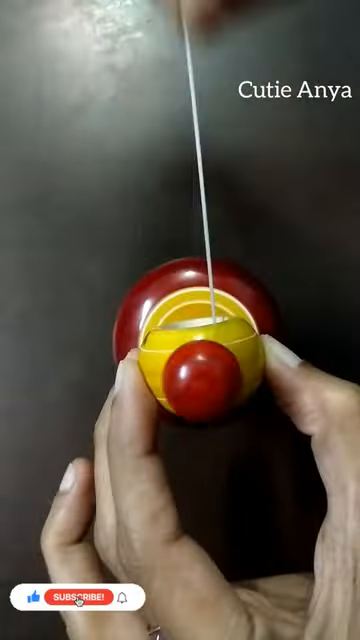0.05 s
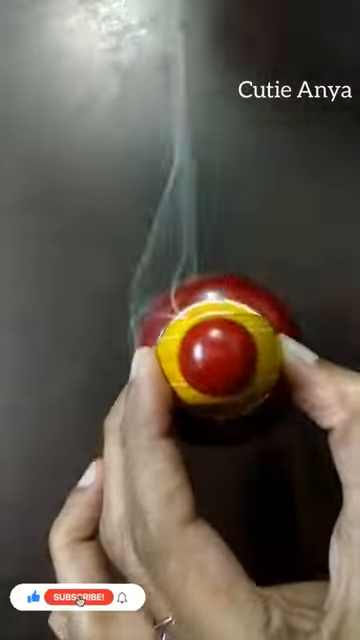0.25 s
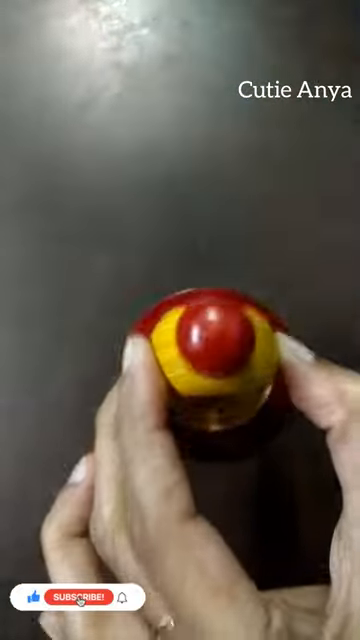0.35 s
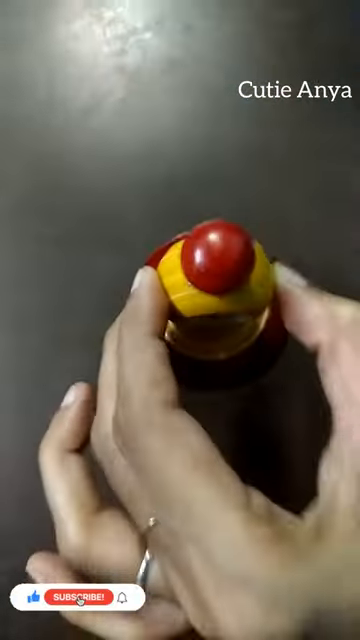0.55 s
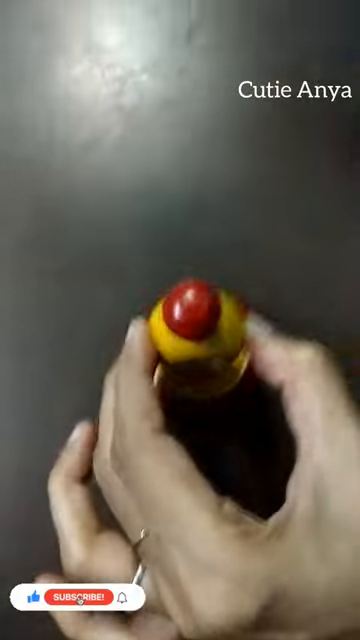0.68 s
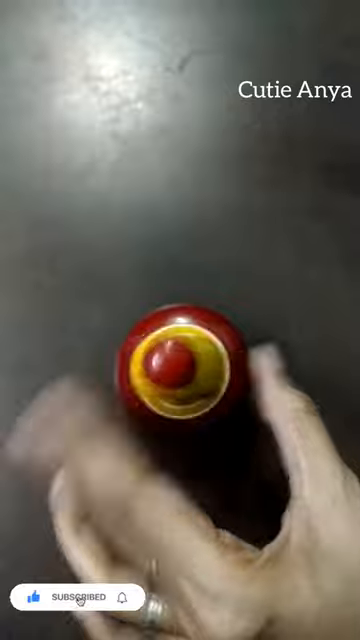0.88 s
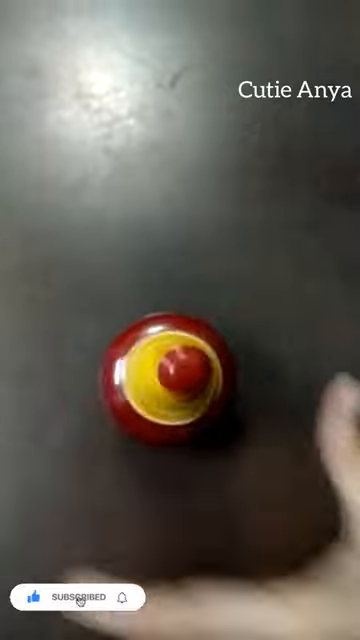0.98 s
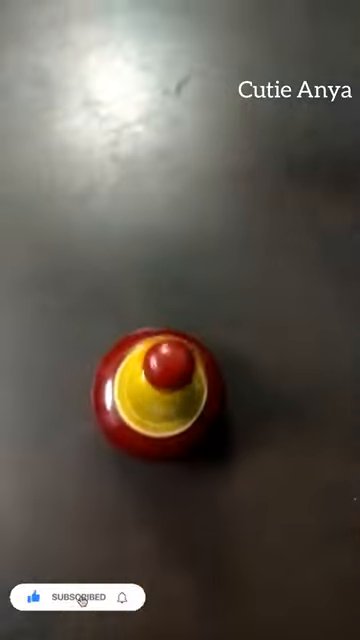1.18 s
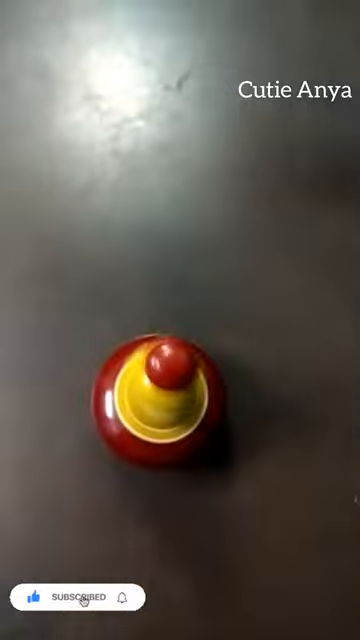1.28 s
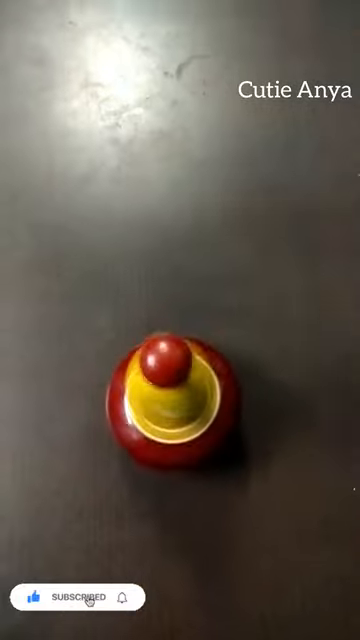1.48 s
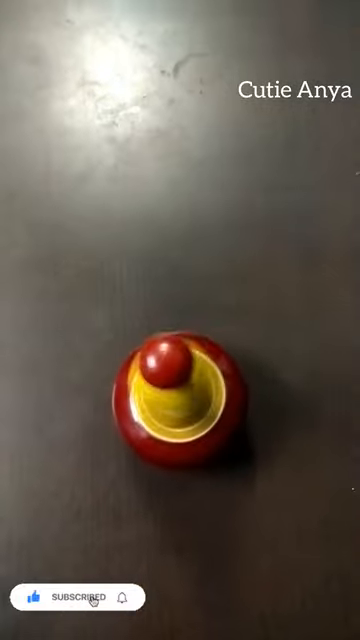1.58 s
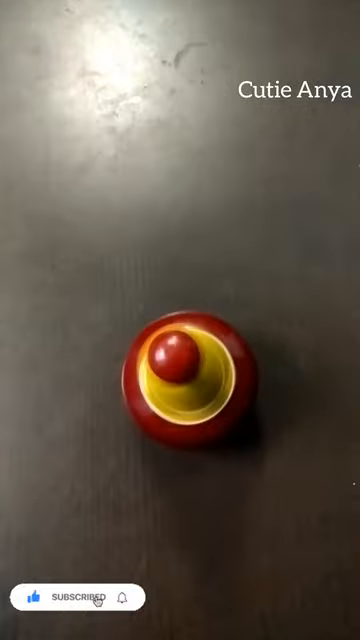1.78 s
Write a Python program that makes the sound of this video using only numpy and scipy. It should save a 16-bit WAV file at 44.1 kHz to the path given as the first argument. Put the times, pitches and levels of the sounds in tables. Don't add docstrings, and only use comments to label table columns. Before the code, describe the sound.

String hisses and whirrs off a hand-held wooden top, which knocks down and spins on faintly

```python
import sys
import numpy as np
from scipy import signal
from scipy.fft import rfft, irfft, next_fast_len
from scipy.io import wavfile
from scipy.ndimage import uniform_filter1d, map_coordinates

SR = 44100
rng = np.random.default_rng(int(sys.argv[2]) if len(sys.argv) > 2 else 0)


def natural_amplitude(level_db):
    exponent = np.asarray(level_db, float) / 20
    return 10 ** exponent


def pcm_store(signal):
    levels = np.round(np.clip(np.atleast_2d(signal), -1, 1) * 32767)
    wavfile.write(sys.argv[1], SR, levels.astype(np.int16).T)


N = 81585

# t/s, level/dB
MOTOR_LEVEL = [(0, -62.5), (.3, -72), (.45, -78), (.6, -81.5)]
# f/Hz, level/dB per Hz
AIR_SPECTRUM = [(12, -5), (20, 2), (131, -15.5), (228, -13), (346, -17.5), (569, -16), (1310, -25.5),
                (6500, -34.5), (14900, -39)]
# f/Hz, left over right/dB
AIR_LEAN = [(60, 3), (900, 3), (2000, -0.5)]
# f/Hz, left leads/rad
AIR_LEAD = [(300, -0.17), (1300, 1.63)]
# f/Hz, left over right/dB
HELD_LEAN = [(300, -2), (1115, 9.5), (2400, -4.5), (5700, 3.5), (6400, -3), (9400, -8.5), (11000, 3.5),
             (14000, 4)]
# f/Hz, left leads/rad
HELD_LEAD = [(300, 0.5), (1115, 0.86), (1500, 4), (2100, 0.2), (3200, -2), (5500, 1), (9070, 2)]
# t/s, level/dB
STRING_LEVEL = [(0, -68.5), (.136, -55), (.2, -47), (.26, -46), (.41, -48), (.6, -55.5), (.75, -52),
                (.8, -57), (.98, -58.5)]
# f/Hz, level/dB per Hz
STRING_SPECTRUM = [(530, -50), (900, -21.5), (1140, -17.5), (4100, -17), (6330, -7), (7200, -11.5),
                   (13700, -13), (14400, -32), (14900, -53)]
# f/Hz, width/Hz, level/dB
NECK_RINGS = [(5646, 480, -7), (6383, 95, 10)]
# t/s, peak level/dB
TURNS = [(0.2403, -34.5), (0.2732, -29.5), (0.2824, -43), (0.315, -32.5), (0.328, -39), (0.3423, -43),
         (0.3706, -35.5), (0.3924, -34.5), (0.4083, -39), (0.4226, -45), (0.4724, -42), (0.4882, -44),
         (0.5636, -40), (0.6455, -39.5), (0.7294, -39), (0.754, -44)]
# t/s, level/dB
SPITS = [
    (0.315, -45),
    (0.512, -46),
    (1.1546, -43.5),
    (1.82, -64),
]
# t/s, level/dB
WHIRR_LEVEL = [(.2, -78), (.34, -51), (.44, -51.5), (.62, -50.5), (.74, -46), (.8, -66)]
# f/Hz, width/Hz, level/dB
AXLE_RINGS = [(9070, 230, 0), (10100, 300, -17), (11900, 400, -17)]
# t/s, peak level/dB
RUBS = [(0.2972, -50), (0.3336, -52), (0.3421, -45), (0.3564, -54), (0.368, -38), (0.399, -38.5),
        (0.4479, -52), (0.463, -41.5), (0.4785, -43.5), (0.4893, -48), (0.5114, -36), (0.525, -34),
        (0.5584, -39), (0.5794, -40), (0.5906, -35.5), (0.5967, -38.5), (0.619, -39), (0.6254, -43),
        (0.6365, -35), (0.644, -42), (0.6564, -39), (0.6701, -37.5), (0.7, -36.5), (0.7134, -45),
        (0.7304, -51), (0.7404, -50), (0.753, -53), (0.7704, -42.5)]
# t/s, level/dB
RATTLE_LEVEL = [(.3, -78), (.35, -57), (.6, -60.5), (.75, -60.5), (.88, -67), (.95, -84), (1.0, -50),
                (1.06, -60), (1.25, -74)]
# f/Hz, width/Hz, level/dB
BODY_RINGS = [(1122.7, 45, 6.5), (2172, 2000, -18)]
# t/s, peak level/dB
JOLTS = [(0.339, -40.5), (0.368, -54), (0.391, -41), (0.4076, -37.5), (0.4682, -36.5), (0.509, -59),
         (0.5284, -54), (0.5802, -44.5), (0.559, -64), (0.612, -53), (0.641, -63), (0.668, -62),
         (0.693, -56), (0.7207, -44), (0.7682, -39), (0.82, -45.5)]
# t/s, peak level/dB, f/Hz
TICKS = [(0.2986, -42, 2680), (0.3295, -46.5, 2700), (0.341, -49.5, 2180), (0.368, -48.5, 2920),
         (0.3926, -41.5, 2624), (0.4206, -42, 2250), (0.4513, -49.5, 2020), (0.4629, -44, 2300),
         (0.5147, -53, 2600), (0.545, -55, 2840), (0.577, -59, 2000), (0.5581, -47, 2190),
         (0.592, -52, 2090), (0.6255, -50.5, 2410), (0.692, -55, 2600), (0.7216, -50.5, 2640),
         (0.7546, -49, 2770), (0.768, -41.5, 2870), (0.85, -57, 3800), (1.138, -59, 4200),
         (1.1556, -51, 1560), (1.211, -62, 2600), (1.1926, -39.5, 3700)]
# f/Hz, width/Hz, level/dB
SHELL_RING = [(6370, 140, 6.5)]
# t/s, level/dB
KNOCKS = [
    (0.7878, -18.5),
    (.792, -21.5),
]
# f/Hz, level/dB, t60/s
TABLE_MODES = [(217, -12, 0.024), (291, -14.5, 0.077), (437, -1.5, 0.076), (602, -11.5, 0.29),
               (850, -20, 0.03)]
# t/s, level/dB
ROLL_LEVEL = [(.83, -44), (.975, -54.5), (1.022, -42.5), (1.045, -47), (1.11, -49.5), (1.135, -57),
              (1.35, -75)]
# f/Hz, width/Hz, level/dB
DRUM_RINGS = [(129, 13, -6.5), (197, 27, -8), (283.7, 15, 1), (361, 62, -7), (443.8, 36.4, 0.5),
              (610, 47, -8), (747, 95, -15)]
# t/s, level/dB, f/Hz
THUMPS = [
    (0.714, -38.5, 133),
    (1.055, -32.5, 146),
    (1.0712, -25, 443),
    (1.111, -33.5, 122),
    (1.1562, -30.5, 427),
    (1.1608, -35, 300),
    (1.403, -37, 554),
]
# t/s, level/dB
DRAUGHT_LEVEL = [(1.04, -56), (1.07, -44), (1.13, -63), (1.165, -62), (1.23, -66)]
# t/s, level/dB
TAPS = [
    (1.021, -37),
    (1.0589, -32.5),
    (1.0727, -33.5),
    (1.1, -40.5),
]
# t/s, level/dB, length/s
PUSHES = [
    (1.062, -37, 0.017),
    (1.153, -34, 0.023),
]
# f/Hz, left over right/dB
DOWN_LEAN = [(250, 0), (440, 1.5), (600, 10), (1500, 7), (5000, 1.5), (8400, -4.5), (11000, 4)]
# f/Hz, left leads/rad
DOWN_LEAD = [(300, 0.013), (3500, 1), (5000, -1.3), (6400, -0.52)]
# t/s, level/dB
SCRAPE_LEVEL = [(.988, -52.5), (.995, -33), (1.026, -41), (1.045, -47.5), (1.12, -53.5), (1.2, -63.5),
                (1.3, -73.5)]
# f/Hz, level/dB per Hz
SKIN_SPECTRUM = [(410, -54), (700, -15.5), (1570, -13), (3420, -10.5), (5640, -7), (6410, -8.5),
                 (7860, -10), (12600, -20.5), (14900, -34)]
# t/s, peak level/dB
SNAPS = [(.9945, -27), (.9974, -24), (.9992, -27), (1.0016, -24), (1.0048, -24), (1.0081, -15),
         (1.0144, -22), (1.0158, -23), (1.0182, -26), (1.0203, -26), (1.0224, -20), (1.0278, -31),
         (1.0316, -29), (1.0357, -28), (1.0395, -32)]
# f/Hz, width/Hz, level/dB
TOP_RINGS = [(3390, 480, -2), (4900, 530, -1.5), (6405, 135, 8.5), (8850, 600, -10.5), (10050, 100, -5)]
# t/s, level/dB
SPIN_LEVEL = [(1.36, -103), (1.45, -73), (1.53, -61.5), (1.85, -75.5)]
# f/Hz, level/dB per Hz
SPIN_SPECTRUM = [(240, -53), (400, -23), (690, -6), (1790, -18.5), (5410, -27), (13200, -27), (14900, -54)]
# t/s, length/s, f/Hz, level/dB
HUMS = [
    (1.507, 0.029, 1345, -67),
    (1.55, 0.044, 746, -69),
    (1.557, 0.03, 2050, -71),
    (1.63, 0.045, 1365, -72),
    (1.65, .04, 706, -71),
    (1.653, 0.062, 1818, -63.5),
    (1.731, 0.025, 881, -64.5),
    (1.76, 0.06, 1795, -71.5),
]
# f/Hz, t60/s
ROOM_DECAY = [(200, 0.19), (2000, 0.18), (10000, 0.14)]
# t/s, level/dB
MASK_THRESHOLD = [(.29, -17), (.32, -5), (.44, -6), (.47, -15), (.58, -15), (.6, -12), (.64, -14),
                  (.675, -7), (.73, -8), (.75, -15)]


def unit(x):
    return x / np.sqrt(np.mean(x ** 2) + 1e-20)


def along(points, hz):
    f, value = np.transpose(points)
    return np.interp(np.log(hz + 1), np.log(f + 1), value)


def level(rows):
    s, db = np.transpose(rows)
    times = np.r_[s[0] - .004, s, s[-1] + .04]
    return natural_amplitude(np.interp(np.arange(N) / SR, times, np.r_[-120, db, -120]))


def wobble(rate):
    knots = rng.standard_normal(int(N * rate / SR) + 4)
    return map_coordinates(knots, [np.arange(N) * rate / SR])


def filtered(x, response):
    m = next_fast_len(N + SR // 2)
    return irfft(rfft(x, m) * response(np.fft.rfftfreq(m, 1 / SR)), m)[..., :N]


def rings(x, peaks):
    def response(f):
        total = 0
        for k, (centre, width, db) in enumerate(peaks):
            damping = 1j * f * width
            total = total + (-1) ** k * natural_amplitude(db) * damping / (centre * centre - f * f + damping)
        return total
    return filtered(x, response)


def grit(rate, depth_db, spectrum=((1, 0), (2, 0))):
    noise = rng.standard_normal(N) * natural_amplitude(depth_db * wobble(rate))
    return unit(filtered(noise, lambda hz: natural_amplitude(along(spectrum, hz))))


def ports(x, lean=HELD_LEAN, lead=HELD_LEAD):
    def half(hz):
        return natural_amplitude(along(lean, hz) / 2) * np.exp(.5j * along(lead, hz))
    return filtered(x, lambda hz: np.array([half(hz), 1 / half(hz)]))


def wide(make, loose_db, lean=HELD_LEAN, lead=HELD_LEAD):
    return unit(ports(make() + natural_amplitude(loose_db) * np.array([make(), make()]), lean, lead))


def burst(s, db, hz, t60, rise_s):
    t = np.maximum(np.arange(N) / SR - s, 0)
    return natural_amplitude(db - 60 * t / t60) * np.sin(2 * np.pi * hz * t) * (1 - np.exp(-t / rise_s))


def swells(events, rise_s, t60):
    gain = 0
    for s, db in events:
        t = np.maximum(np.arange(N) / SR - s, 0)
        gain = gain + natural_amplitude(db - 60 * t / t60) * (1 - np.exp(-t / rise_s))
    return gain


def air():
    hum = level(MOTOR_LEVEL) * unit(rings(rng.standard_normal(N), [(165.5, 2, 0)]))
    tone = wide(lambda: grit(12, 0.33, AIR_SPECTRUM), -5.0, AIR_LEAN, AIR_LEAD)
    return hum + natural_amplitude(-60) * tone


def string():
    t = np.arange(N) / SR
    hiss = wide(lambda: grit(400, 2.5, STRING_SPECTRUM), 4.5)
    neck = rings(hiss * natural_amplitude(2.7 * np.array([wobble(130), wobble(128.85)])), NECK_RINGS)
    sway = natural_amplitude(1.2 * wobble(69))
    pull = level(STRING_LEVEL) * sway * natural_amplitude(1.36) * (hiss + neck)
    flicked = wide(lambda: unit(rings(grit(400, 1.4), NECK_RINGS)), -12.0)
    turns = natural_amplitude(2.5) * swells(TURNS, 0.0007, 0.018) * flicked
    clicks = sum((t > s) * natural_amplitude(db - 60 * abs(t - s) / 0.0073) for s, db in SPITS)
    spits = clicks * grit(3.9, 0.064, [(5000, -42), (8000, 0)])
    return pull + turns + spits * natural_amplitude([[3.5], [-6.]])


def axle():
    rub = level(WHIRR_LEVEL) * natural_amplitude(-1.0 + 1.5 * wobble(59.0)) + natural_amplitude(3.0) * swells(RUBS, 0.00089, 0.017)
    whirr = rub * wide(lambda: unit(rings(grit(200, 1.1), AXLE_RINGS)), 1.6)
    shake = wide(lambda: unit(rings(grit(45, 2.5), BODY_RINGS)), -9.)
    body_hz = BODY_RINGS[0][0]
    jolts = sum(burst(s, db + 2.0, body_hz, 0.04, 0.0026) for s, db in JOLTS)
    return whirr + ports(jolts) + level(RATTLE_LEVEL) * natural_amplitude(3.5) * shake


def ticks():
    out = np.zeros(N)
    for s, db, hz in TICKS:
        out += burst(s, db + 11.5, hz, .0035, .0001)
        out += burst(s + .0004, db + 7.5, .72 * hz, .004, .0001)
        out += burst(s + .0013, db + 3.5, 1.15 * hz, .005, .0001)
    late = out * (np.arange(N) >= SR)
    s, db, _ = TICKS[-1]
    shell = burst(s, db + 8.0, SHELL_RING[0][0], 0.011, 0.00015)
    return ports(out - late) + (late + shell) * natural_amplitude([[-1.5], [-14.]])


def table():
    knock = 0
    for s, blow_db in KNOCKS:
        for hz, db, t60 in TABLE_MODES:
            knock = knock + burst(s, blow_db + db, hz, t60, 0.002)
    knock = knock * natural_amplitude(-900 * np.maximum(np.arange(N) / SR - .822, 0))
    roll = level(ROLL_LEVEL) * unit(rings(grit(90, 3.2), DRUM_RINGS))
    hand = sum(burst(s, db, hz, 1.8 / hz, .04 / hz) for s, db, hz in THUMPS)
    draught = grit(20.4, 2.5, [(12, -6), (25, -12.0), (80, -4), (300, -45)])
    hand = hand + level(DRAUGHT_LEVEL) * draught
    hand = hand + sum(burst(s, db, 434, 0.056, 0.0007) for s, db in TAPS)
    hand = hand + sum(burst(s, db, .4 / long, 4.2 * long, .3 * long) for s, db, long in PUSHES)
    return ports(roll - knock, DOWN_LEAN, DOWN_LEAD) + hand * natural_amplitude([[3.5], [-15.]])


def fingers():
    snaps = np.zeros((2, N))
    t = np.arange(SR // 100) / SR
    for s, db in SNAPS:
        drag = 0.62 * rng.standard_normal((2, len(t))) + rng.standard_normal(len(t))
        slip = np.zeros((2, N))
        slip[:, round(s * SR):][:, :len(t)] = natural_amplitude(-60 * t / 0.002) * drag
        ring = rings(slip, TOP_RINGS)
        snaps += natural_amplitude(db + 1.4) * ring / abs(ring.mean(axis=0)).max()
    rub = wide(lambda: grit(600, 3., SKIN_SPECTRUM), 2.5, DOWN_LEAN, DOWN_LEAD) * level(SCRAPE_LEVEL)
    return rub + natural_amplitude(3.5) * rings(rub, SHELL_RING) + ports(snaps, DOWN_LEAN, DOWN_LEAD)


def spin():
    t = np.arange(N) / SR
    hum = 0
    for s, long, hz, db in HUMS:
        swell = natural_amplitude(db + 2.5 + 2.2 * wobble(39.9)) * np.exp(-((t - s) / long) ** 2)
        hum = hum + swell * np.sin(2 * np.pi * hz * t + 1.5 * wobble(45))
    hiss = wide(lambda: grit(7.6, 2.3, SPIN_SPECTRUM), -1.0, AIR_LEAN, AIR_LEAD)
    return ports(hum, AIR_LEAN, AIR_LEAD) + level(SPIN_LEVEL) * natural_amplitude(1.5) * hiss


def room(x):
    hz, t, z = signal.stft(rng.standard_normal((2, SR // 2)), SR, nperseg=256)
    decay = natural_amplitude(-60 * t / along(ROOM_DECAY, hz)[:, None])
    tail = signal.istft(z * decay, SR, nperseg=256)[1]
    delayed = np.pad(x, ((0, 0), (300, 0)))
    return signal.fftconvolve(delayed, tail / np.linalg.norm(tail[0]), axes=1)[:, :N]


def masked(x):
    hz, t, z = signal.stft(x, SR, nperseg=2048)
    power = np.mean(abs(z) ** 2, axis=0)
    smooth = uniform_filter1d(uniform_filter1d(power, size=16, axis=0), size=2, axis=1)
    bands = smooth[8::16].repeat(16, axis=0)
    treble = power[(hz > 5000) & (hz < 10000)].mean(axis=0)
    weak = bands < natural_amplitude(2 * np.interp(t, *np.transpose(MASK_THRESHOLD))) * treble
    z[:, :-1] *= 1 - weak * ((hz > 3050) & (hz < 4150))[:-1, None]
    return signal.istft(z, SR, nperseg=2048)[1][:, :N]


def scene():
    near = string() + axle() + ticks() + fingers() + spin()
    low = table()
    return air() + near + low + natural_amplitude(-12.0) * room(near + natural_amplitude(-6.0) * low)


def top_cut(x):
    return signal.sosfilt(signal.butter(12, 15060, fs=SR, output="sos"), x)


def record(dry):
    mix = masked(filtered(dry, lambda hz: hz < 14600))
    return top_cut(mix)


dry = scene()
out = record(dry)
pcm_store(out)
```